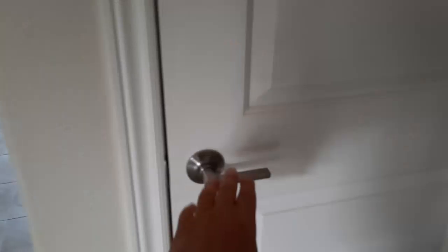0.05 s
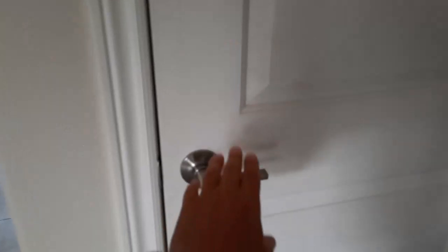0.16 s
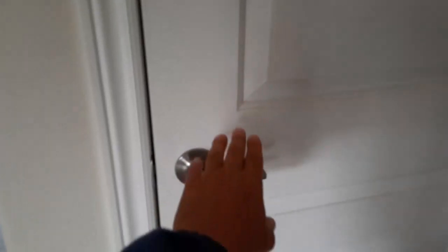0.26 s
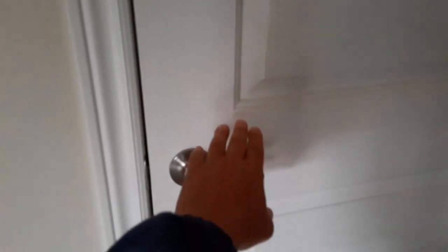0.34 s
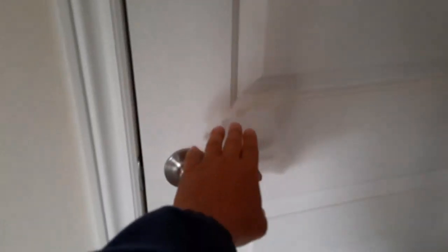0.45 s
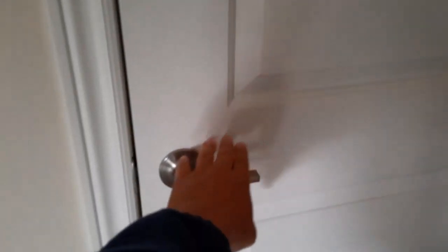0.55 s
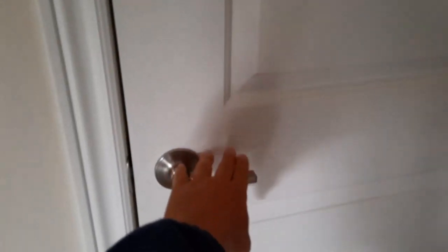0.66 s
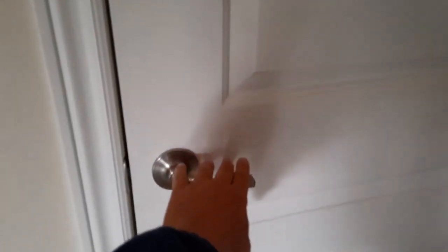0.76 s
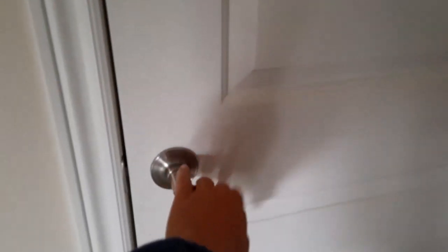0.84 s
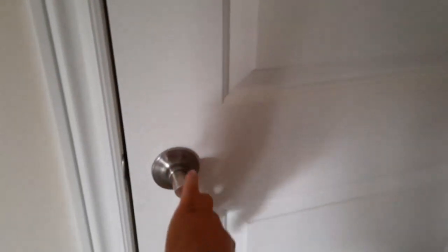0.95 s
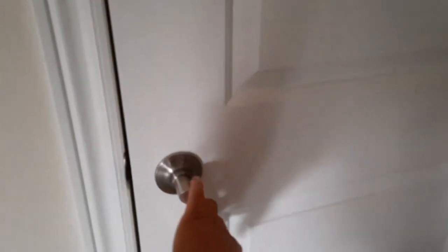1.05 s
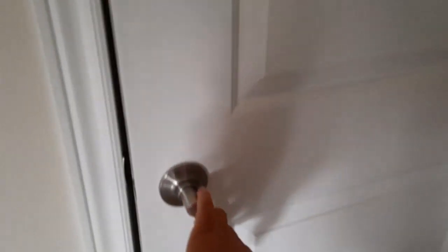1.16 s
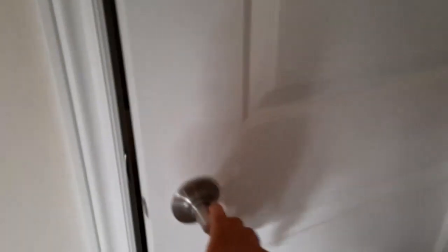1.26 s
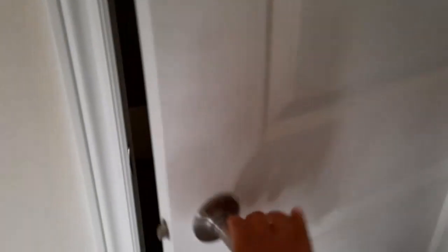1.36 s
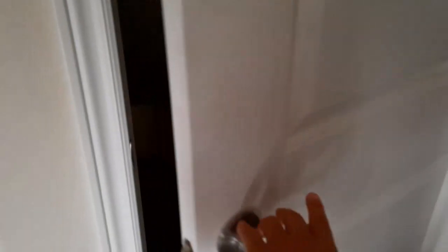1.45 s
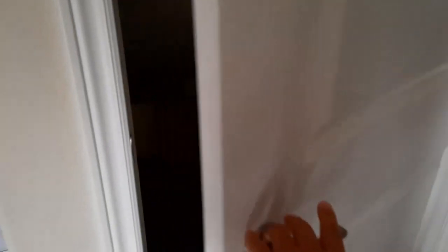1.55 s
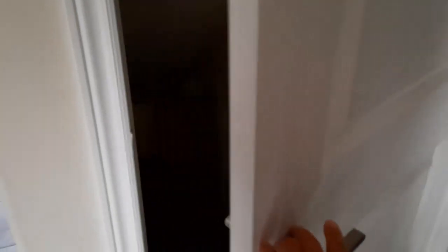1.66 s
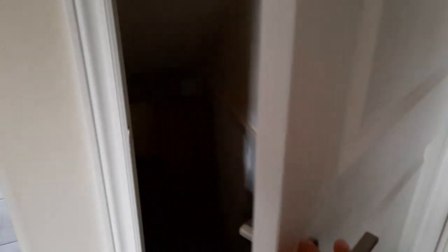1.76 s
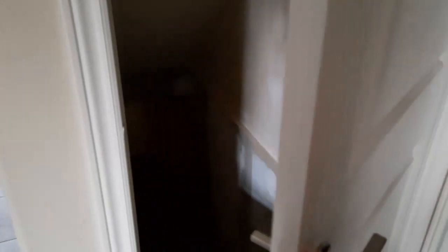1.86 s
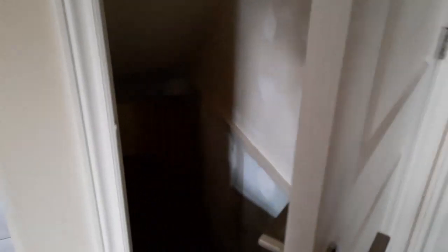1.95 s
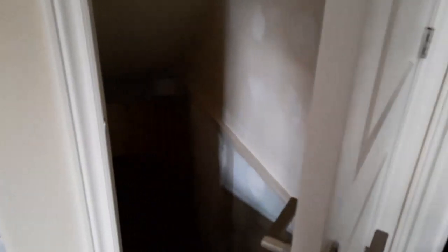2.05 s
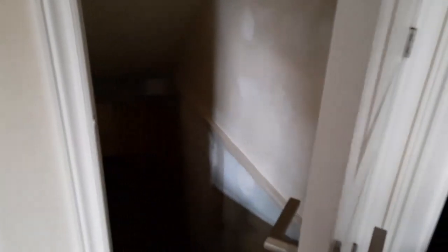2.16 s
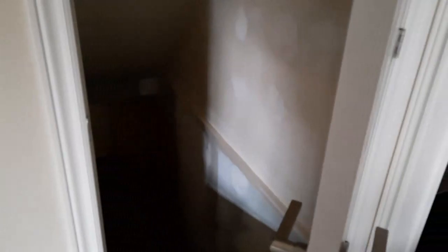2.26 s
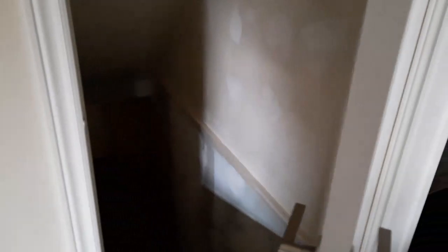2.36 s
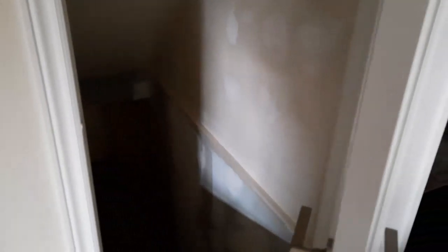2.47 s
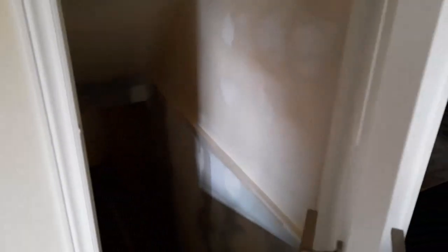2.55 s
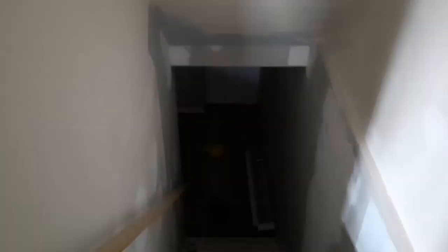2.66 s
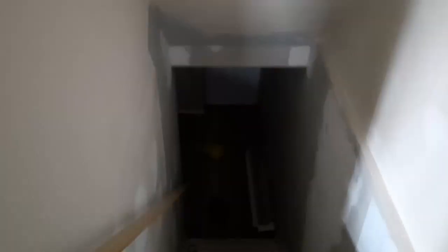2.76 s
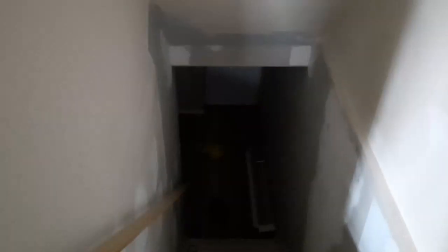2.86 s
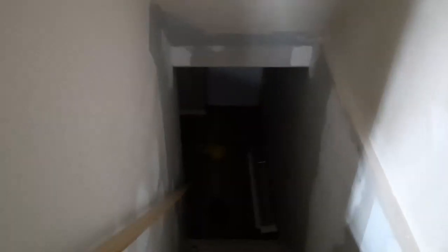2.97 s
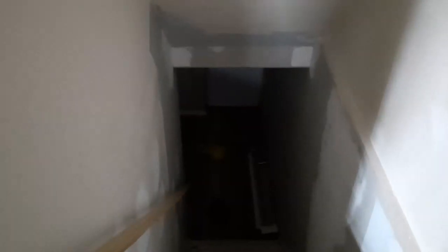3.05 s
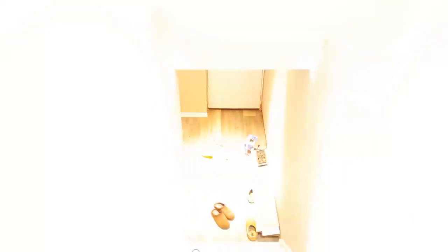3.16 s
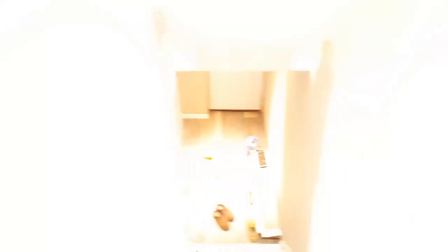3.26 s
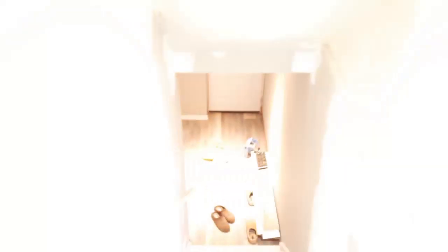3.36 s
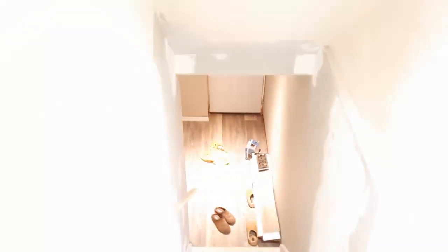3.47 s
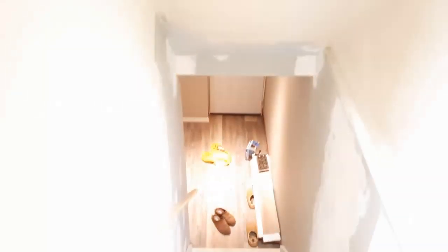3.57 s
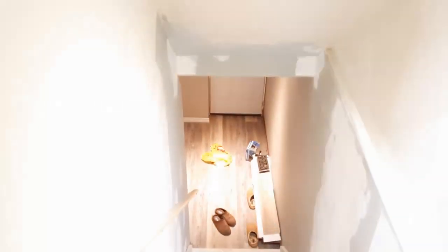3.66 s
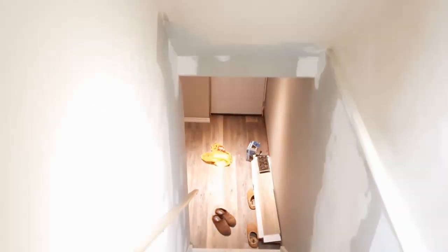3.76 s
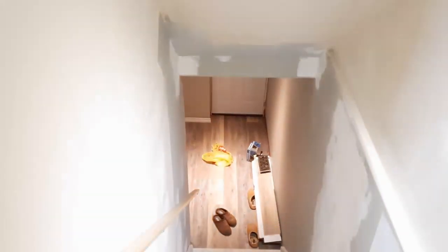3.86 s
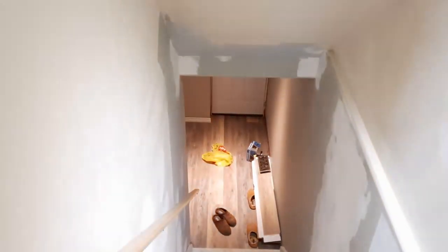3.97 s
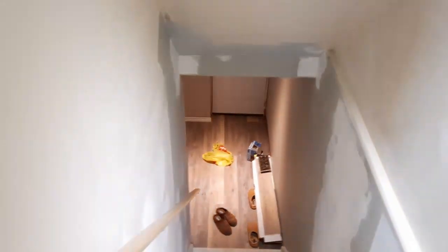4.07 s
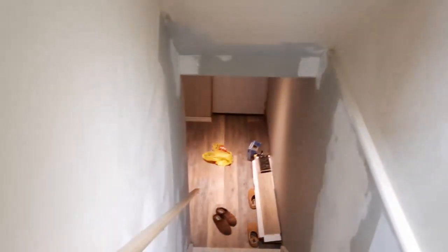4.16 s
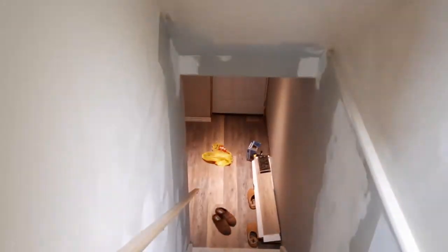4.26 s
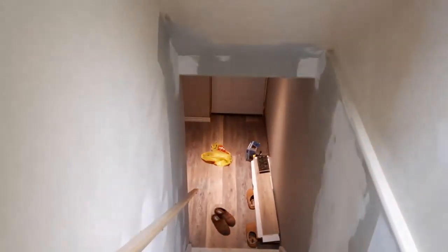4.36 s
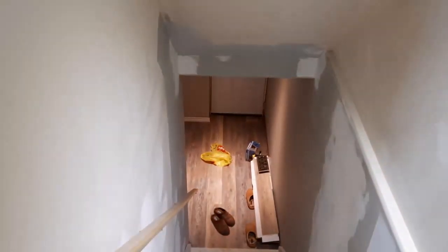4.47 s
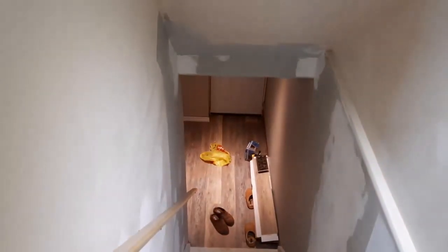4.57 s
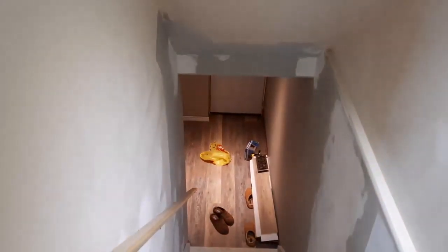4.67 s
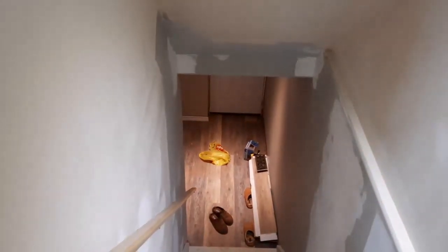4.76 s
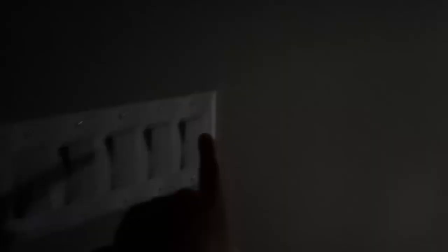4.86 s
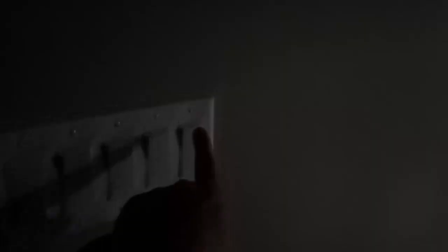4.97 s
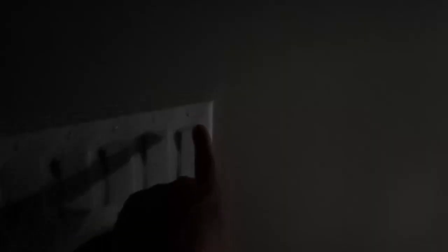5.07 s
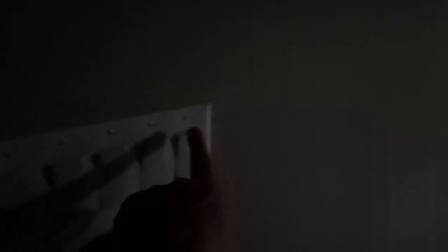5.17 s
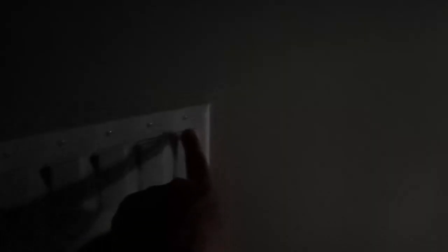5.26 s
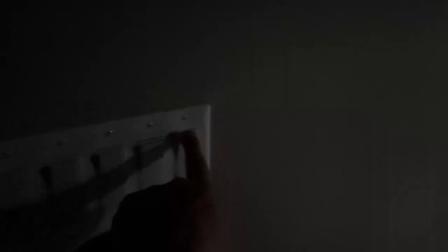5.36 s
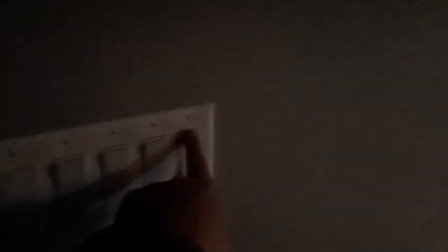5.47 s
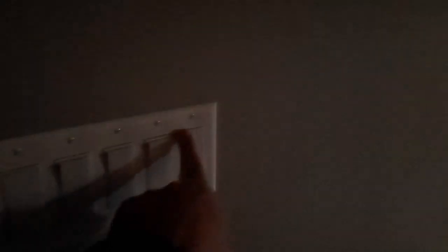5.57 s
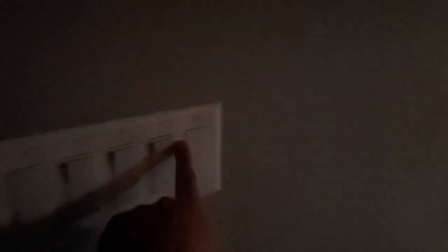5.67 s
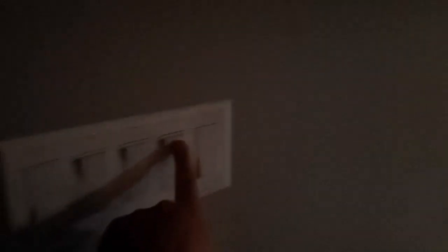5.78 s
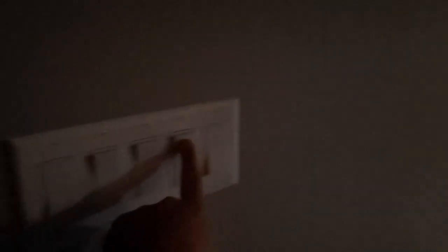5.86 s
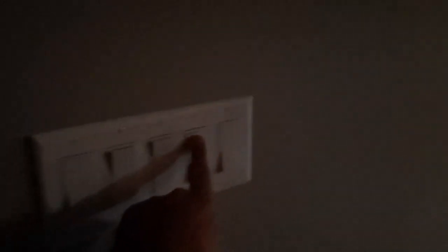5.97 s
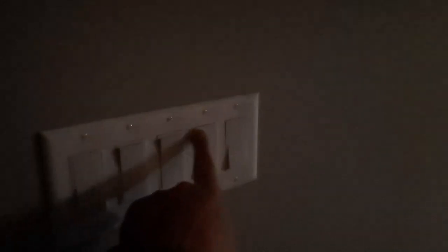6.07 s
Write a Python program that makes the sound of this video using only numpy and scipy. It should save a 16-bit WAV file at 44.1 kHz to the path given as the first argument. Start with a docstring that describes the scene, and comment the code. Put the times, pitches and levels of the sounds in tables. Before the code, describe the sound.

Close hand-held stereo microphones in a quiet house with a faint low hum. A door lever clicks and rattles, its latch squeaks upward, and the wooden door jolts free with hard knocks and a rub, then a very faint hinge creak. A switch snaps loudly in an echoing stairwell; after soft grip scuffs the hum stops, and two drier switch snaps follow.

```python
"""A quiet house on close, hand-held stereo microphones: low hum, sleeve noise, the first instants dipped in level.
A lever handle clicks, the latch squeaks back, a wooden door jolts free of its frame and its hinge creaks.
Then a rocker switch snaps at the top of an echoing stairwell, the grip scuffs, the hum ends, two more snap.
Blows ring resonances through walls and tail, the squeak sums stick-slip overtones, rubs are shaped noise,
and the hum is a wavering sine; the level dips briefly four more times between door and second switch."""
import sys
import numpy as np
from scipy import signal
from scipy.fft import rfft, irfft
from scipy.io import wavfile
from scipy.ndimage import uniform_filter1d

SR = 44100
rng = np.random.default_rng(int(sys.argv[2]) if len(sys.argv) > 2 else 0)


def persist_wave(psi):
    """Save psi, clipped to +-1, as 16-bit WAV."""
    counts = np.round(np.clip(psi, -1, 1) * 32767).astype(np.int16)
    wavfile.write(sys.argv[1], SR, np.atleast_2d(counts).T)


N = 269892
TAPS = 8192  # length of a struck response, in samples


# metal clicks of lever, spring and latch [t/s, level/dB, brightness/dB, direct/dB]
LATCH_CLICKS = [(0.61, -72.5, 7, 4.5), (0.865, -52, 3.5, -7), (.8735, -39, -3.5, -16),
                (0.9, -28.5, -2.5, -7), (.918, -35, 9, -7), (.940, -32, 0, -2.5), (1.011, -42, -0.5, 7),
                (1.128, -31.5, -10.5, 4), (1.356, -45.5, -4, -2), (1.3956, -27, 3.5, -3.5),
                (1.422, -25.5, -0.5, -2.5), (1.4293, -19, -6.5, 1.5), (1.452, -36, 1.5, -2.5),
                (1.475, -28.5, -3, -2), (1.558, -35, -3.5, -8), (1.6212, -42, -10.5, 5.5),
                (1.713, -71.5, 13.5, -3)]
# the door knocks in its frame and rebounds once; the first row is the palm landing on the door [t/s, level/dB,
# panel weight/dB, rebound after/s]
DOOR_KNOCKS = [(0.637, -64.5, 9, 0.071), (.799, -51.5, -2, 0.016), (.822, -50.5, -8, 0.016),
               (.899, -35.5, 1, 0.041), (.959, -30, -5, 0.027), (1.030, -37, -5.5, .032),
               (1.142, -36, -1.5, 0.051), (1.383, -36, -15.5, .013), (1.454, -27, -7, 0.024),
               (1.4813, -22, -11.5, .0095), (1.564, -27.5, -14.5, .011), (1.6202, -34, -24, .016)]
CLICK_THUMP_DB, CLICK_KNOCK_DB = -17.5, -3.5  # how little a click stirs the panel and the wood
KNOCK_CLACK_DB, KNOCK_TICK_DB = -10.5, -24.5  # how little a knock stirs the metal
REBOUND_DB, KNOCK_DIRECT_DB = -5, 4


def door_blows():
    """Clicks stir mostly metal, knocks mostly wood: t/s, thump, knock, clack and tick/dB, direct/dB."""
    for start, level_db, bright_db, direct_db in LATCH_CLICKS:
        yield start, level_db + np.array([CLICK_THUMP_DB, CLICK_KNOCK_DB, 0, bright_db]), direct_db
    for start, level_db, weight_db, rebound_s in DOOR_KNOCKS:
        band_db = level_db + np.array([weight_db, 0, KNOCK_CLACK_DB, KNOCK_TICK_DB])
        yield start, band_db, KNOCK_DIRECT_DB
        yield start + rebound_s, band_db + REBOUND_DB, KNOCK_DIRECT_DB


# centres of the thump, knock, clack and tick bands [f/Hz]
DOOR_BANDS = [100, 350, 1400, 6000]
# broad colour of the struck door [f/Hz, level/dB]
DOOR_COLOUR = [(18, -54.5), (30, -25.5), (81, -15), (245, -5.5), (295, -1), (355, -8.5), (404, -2),
               (473, -9), (866, -3), (1130, -11.5), (1460, -11.5), (11400, -40.5), (16000, -39.5)]
# resonances of door and latch [f/Hz, width/Hz, lift/dB]
DOOR_MODES = [(84.5, 8, 6), (161.5, 3, 9.5), (297, 22, 3.5), (393, 16, 8), (422, 10, -2), (505, 25, 4.5),
              (529.4, 14, 11), (620, 11, 6), (722.5, 11, 6.5), (862.3, 7.8, 4), (1184.3, 39, 5.5),
              (1356, 39, -2.5), (2100, 66, 1), (2500, 430, 9.5), (3340, 63, 6.5), (11840, 2200, 7)]


def door(blow_s=0.0086, spot_db=5.0):
    """Every blow rings the same door; where it lands decides how much panel, wood and metal answer."""
    hz = np.fft.rfftfreq(TAPS, 1 / SR)
    out = np.zeros((2, N))
    response = body(DOOR_COLOUR, DOOR_MODES, uneven_db=2.25)
    parts = []
    for share in np.eye(len(DOOR_BANDS)):
        band = read(list(zip(DOOR_BANDS, share)), hz)
        parts.append(unit(response * band ** 2))
    for start, band_db, direct_db in door_blows():
        power = sum((amp(db) * part) ** 2 for db, part in zip(band_db, parts))
        gain = np.sqrt(blow_s * SR * power)
        # each point of contact favours its own metal resonances
        gain *= amp(spot_db * wobble(size=45) * hz / (hz + 2000))
        space = room(direct_db, pan_db=-3.0, lag=.00014, build=0, length=0.85,
                     walls_db=-2.0, tail_db=1.0, swell_hz=100)
        add(out, start, heard(ring(gain), space))
    return out


# partials of the squeaking latch [multiple of the fundamental, level/dB]
SQUEAK_ORDERS = [(1, -2.5), (2, -9), (3, -16.5), (4, -12.5), (5, -21.5), (6, -24), (7, -24.5), (8, -26),
                 (9, -29.5)]
SQUEAK_FROM_S, SQUEAK_TO_S = 1.12, 1.30  # the latch bolt slides back
SQUEAK_LOW_HZ, SQUEAK_HIGH_HZ = 1413, 1805  # pitch follows the bolt's travel, easing in and out
SQUEAK_DB, SQUEAK_SWELL_DB = -47, 10.5  # base level, and its growth as the spring tightens
BITE_DB, BITE_DEPTH_DB, BITE_SKEW = 4.5, 15, 1.8  # overtones arch up late, where the bolt bites hardest
BITE_DIP = .35  # share of the overtones' arch that the fundamental gives up


def squeak(jitter=.004, flutter_db=2.5):
    """Metal sticks and slips on the strike plate, faster and louder as the bolt draws back."""
    span = slice(round(SQUEAK_FROM_S * SR), round(SQUEAK_TO_S * SR))
    progress = np.linspace(0, 1, span.stop - span.start)
    travel = np.sin(np.pi / 2 * progress) ** 2
    hz = SQUEAK_LOW_HZ + (SQUEAK_HIGH_HZ - SQUEAK_LOW_HZ) * travel
    turns = np.cumsum(hz * (1 + jitter * drift(250)[span])) / SR
    bite_db = BITE_DB - BITE_DEPTH_DB * (1 - np.sin(np.pi * progress ** BITE_SKEW))
    tone = np.zeros(len(turns))
    for order, order_db in SQUEAK_ORDERS:
        lift_db = bite_db * (1 if order > 1 else -BITE_DIP)
        flutter = flutter_db * drift(220)[span]  # each partial flutters by itself
        tone += amp(order_db + lift_db + flutter) * np.sin(2 * np.pi * order * turns)
    tone *= amp(SQUEAK_DB + SQUEAK_SWELL_DB * progress) * signal.windows.tukey(len(turns), .08)
    space = room(direct_db=2.0, pan_db=-8.0, lag=.00002, build=0, length=1.0,
                 walls_db=2.5, tail_db=-4, swell_hz=0)
    out = np.zeros((2, N))
    add(out, SQUEAK_FROM_S, heard(tone, space))
    return out


# the bolt, then the door edge, rub along the frame [t/s, rise/s, hold/s, level/dB]
FRAME_RUBS = [(1.16, 0.098, 0.066, -46), (1.318, .008, .1, -35.5)]
# wood dragging over wood [f/Hz, level/dB]
RUB_COLOUR = [(59, -51), (100, -23.5), (389, -2.5), (691, -21.5), (930, -10), (1360, -19.5), (1720, -13),
              (2270, -21), (4570, -22), (16000, -36.5)]
# the hinge creaks faintly as the door swings [t/s, rise/s, hold/s, level/dB]
HINGE_CREAKS = [(1.87, 0.067, 0.031, -61)]
# colour of the hinge [f/Hz, level/dB]
CREAK_COLOUR = [(250, -36), (700, -7), (950, 0.5), (1300, -23.5), (1750, -14), (2050, -4), (2450, -24),
                (8000, -31)]


def rub(grain_db=2.5):
    """Painted wood drags over wood in small catches; then the hinge creaks."""
    frame = noise(RUB_COLOUR) * strokes(FRAME_RUBS, release_s=0.0091)
    hinge = noise(CREAK_COLOUR) * strokes(HINGE_CREAKS, release_s=0.08)
    return (frame + hinge) * amp(grain_db * drift(300))


# three rockers, the first above the stairwell; pan is left over right, of the direct sound
# [t/s, level/dB, direct/dB, pan/dB, right microphone delay/s, echo build-up/s, echo t60 factor]
SWITCHES = [(3.099, -21, -4.5, 1.5, .00036, 0.072, 0.87), (5.426, -23.5, 0.5, -1.5, .00009, 0.00079, 1.015),
            (5.9873, -22.5, 3.5, -1.5, .00002, 0.0011, 1.26)]
# one broad colour for each rocker [f/Hz, level/dB]
SWITCH_COLOURS = [
    [(24, -48.5), (40, -9), (106, -16.5), (176, -9), (237, -16.5), (329, -4), (455, -14), (663, -8.5),
     (751, -22.5), (873, -14.5), (1340, -21), (2150, -12), (3470, -21), (12800, -17.5), (16000, -25.5)],
    [(24, -75), (40, -33), (106, -13), (226, -17), (283, -5), (402, -14.5), (585, -12), (852, -11),
     (1150, -9.5), (2630, -12), (5050, -22.5), (6170, -15.5), (8340, -26.5), (12100, -24), (16000, -35)],
    [(24, -60.5), (40, -11.5), (81, -32), (112, -7), (209, -14), (337, -2.5), (570, -12), (1070, -9),
     (1520, -19.5), (2150, -11.5), (3300, -19), (6490, -12), (8340, -21.5), (11800, -16), (16000, -23)],
]
# one set of resonances for each rocker [f/Hz, width/Hz, lift/dB]
SWITCH_MODES = [
    [(297, 40, 3.9), (660, 63, 1.4), (872, 38, 1.9), (1900, 280, 1.7), (2330, 470, 7.9), (7140, 200, 4),
     (9700, 200, 3)],
    [(302, 126, 5.9), (734, 36, 8.5), (950, 30, 5.6), (1400, 36, 1.8), (1726, 95, 6.8), (2670, 220, 2.6),
     (6100, 210, 2.8)],
    [(287, 27, 9.9), (1010, 97, 0.92), (1250, 390, 6.3), (2190, 170, 11.7), (2530, 390, 8.1),
     (4430, 500, 5.1), (6330, 490, 4.9)],
]
# the fingertip lands, the rocker trips, strikes its stop and bounces [t after the snap/s, level/dB]
SNAP = [(-.043, -53), (-.004, -32), (0, -3), (.0011, -5), (.0078, -7)]


def switches(blow_s=0.018):
    """Each rocker snaps over and rings its plastic plate and the hollow wall behind it."""
    out = np.zeros((2, N))
    for place, colour, modes in zip(SWITCHES, SWITCH_COLOURS, SWITCH_MODES):
        start, level_db, direct_db, pan_db, lag, build, length = place
        click = amp(level_db) * np.sqrt(blow_s * SR) * ring(unit(body(colour, modes)))
        # direct sound and echoes together lean further to the same side
        lean = amp([[pan_db / 4], [-pan_db / 4]])
        for delay, contact_db in SNAP:
            # a deeper space fills more slowly and its tail carries more energy
            space = room(direct_db, pan_db, lag, build, length, walls_db=-2,
                         tail_db=2.0 + 60 * build, swell_hz=900 + 50000 * build)
            add(out, start + delay, amp(contact_db) * heard(click, space) * lean)
    return out


# the hand shifts its grip beside the right microphone [t/s, rise/s, hold/s, level/dB]
GRIP_SCUFFS = [(4.109, .002, 0.02, -47), (4.15, 0.036, 0.092, -60), (4.30, 0.043, 0.026, -64),
               (4.66, 0.045, 0.079, -66.5)]
# colour of skin at the microphones [f/Hz, level/dB]
GRIP_COLOUR = [(24, -42), (40, -5.5), (185, -5), (243, -17), (329, -0.5), (491, -17), (2150, -17),
               (3470, -23), (7930, -25.5), (11300, -17.5), (16000, -24.5)]
# a sleeve slides as the arm moves [t/s, rise/s, hold/s, level/dB]
ARM_MOVES = [(0, 0.015, 0.4, -64), (.57, 0.059, 0.037, -64), (2.1, 0.47, .02, -65.5),
             (2.7, .03, 0.052, -68.5), (3.45, 0.16, 0.29, -73), (4.89, 0.017, 0.018, -73),
             (5.62, 0.026, .01, -70)]
# colour of the cloth [f/Hz, level/dB]
SLEEVE_COLOUR = [(880, -37), (1500, -10), (2000, -7), (3410, -6.5), (4420, -12.5), (6180, -6),
                 (12500, -1.5), (16000, -15.5)]
# a fingertip slides on a rocker before it trips [t/s, rise/s, hold/s, level/dB]
FINGER_TOUCHES = [(5.37, 0.016, 0.01, -55.5), (5.935, .01, 0.044, -68.5)]
# colour of the fingertip on plastic [f/Hz, level/dB]
FINGER_COLOUR = [(100, -9), (350, 7), (1200, -21), (2300, -6.5), (4000, -20), (7000, -40), (16000, -46)]


def handling(grain_db=2.3, grip_pan_db=-14, sleeve_grain_db=0.6, finger_grain_db=2.0):
    """Skin scuffs beside the microphone and on the rockers and cloth slides, in small uneven grains."""
    grip = noise(GRIP_COLOUR) * strokes(GRIP_SCUFFS, release_s=0.024) * amp(grain_db * drift(248))
    sleeve = noise(SLEEVE_COLOUR) * strokes(ARM_MOVES, release_s=.13) * amp(sleeve_grain_db * drift(120))
    finger = noise(FINGER_COLOUR) * strokes(FINGER_TOUCHES, release_s=0.0082)
    finger *= amp(finger_grain_db * drift(200))
    return grip * amp([[grip_pan_db / 2], [-grip_pan_db / 2]]) + sleeve + finger


# low noise of the quiet house [f/Hz, level/dB]
HOUSE_COLOUR = [(15, -50), (25, -19), (87, -2), (149, -10.5), (180, 3), (206, -10.5), (416, -11),
                (503, -17.5), (545, -17), (2000, -25.5), (2480, -31), (11300, -32.5), (16000, -43)]
HOUSE_DB = -63.5
HUM_DB, HUM_NEARING_DB_PER_S = -73, 1.8  # the hum grows towards the stairwell
HUM_ENDS_S = 4.88


def house(hum_hz=179, waver=0.0047, swell_db=0.5, fade_s=0.023):
    """Low room noise and the wavering hum of a distant fan."""
    t = np.arange(N) / SR
    turns = np.cumsum(hum_hz * (1 + waver * drift(16))) / SR
    hum_level = amp(HUM_DB + HUM_NEARING_DB_PER_S * t + swell_db * drift(9.9))
    hum_level *= np.clip((HUM_ENDS_S - t) / fade_s, 0, 1)
    hum = np.sqrt(2) * np.sin(2 * np.pi * turns) * hum_level
    return noise(HOUSE_COLOUR) * amp(HOUSE_DB + .5 * drift(3.2)) + hum


# near walls, each delay varied at random by up to 30 % [delay/s, level/dB]
WALLS = [(.0034, -4.5), (.0052, -2), (.0089, -8.5), (0.0114, -12), (0.021, -16.5), (.029, -17)]
# time for the tail to fall 60 dB, scaled by each place's factor [f/Hz, t60/s]
ROOM_T60 = [(80, 0.48), (300, 0.36), (900, 0.43), (2200, 0.4), (6000, 0.48), (10000, .37), (16000, 0.25)]
# what the walls return [f/Hz, level/dB]
TAIL_COLOUR = [(60, 4.5), (3000, 0.5), (7000, -4), (10000, -6), (16000, -3.5)]


def room(direct_db, pan_db, lag, build, length, walls_db, tail_db, swell_hz):
    """Direct sound, near walls, then a diffuse tail that holds for the build-up time and dies by band."""
    size = 32768  # samples
    echoes = rng.standard_normal((2, size)) * (rng.random((2, size)) < .2)  # sparse random echoes
    hz, t, z = signal.stft(echoes, SR, nperseg=256)
    hz = hz[:, None]
    fall_db = 60 * np.maximum(t - build, 0) / (length * read(ROOM_T60, hz))
    decay = amp(read(TAIL_COLOUR, hz) - fall_db)
    # bass takes longer than treble to fill the space
    swell = 1 - np.exp(-t / (.002 * (1 + swell_hz / (hz + 100))))
    tail = signal.istft(paired(z, hz) * decay * swell, SR, nperseg=256)[1][:, :size]
    out = amp(tail_db) * unit(tail) / np.sqrt(size)
    for delay, db in WALLS:
        arrival = delay * rng.uniform(.7, 1.3) + rng.uniform(0, 0.0003, 2)  # s, left and right
        at = np.round(arrival * SR).astype(int)
        out[[0, 1], at] += amp(db + walls_db) * rng.choice([-1, 1])
    out[0, 0] += amp(direct_db + pan_db / 2)
    out[1, round(abs(lag) * SR)] += amp(direct_db - pan_db / 2)
    return heard(crack(), out)


def crack(spread_s=.0012):
    """Bending waves reach the air at slightly different times, so a blow is a short crack."""
    delay = spread_s * (1 + np.tanh(wobble(size=200))) / 2
    phase = 2 * np.pi * np.cumsum(delay) / TAPS * SR
    return irfft(np.exp(-1j * phase))[:TAPS // 2]


def body(colour, modes, uneven_db=1.5):
    """Frequency response of a struck thing: main resonances and many small ones on a broad colour."""
    hz = np.fft.rfftfreq(TAPS, 1 / SR)
    peaks = sum((amp(db) ** 2 - 1) / (1 + (2 * (hz - f) / width) ** 2) for f, width, db in modes)
    small_db = uneven_db * wobble(size=10) * hz / (hz + 700)
    return amp(read(colour, hz) + small_db) * np.sqrt(np.maximum(1 + peaks, .1))


def ring(gain):
    """The causal click that has this frequency response, its phase following from its gain."""
    both_sides = np.r_[gain, gain[-2:0:-1]]
    log_gain = np.log(np.maximum(both_sides, gain.max() * 1e-5))
    return np.fft.ifft(np.exp(np.conj(signal.hilbert(log_gain)))).real[:TAPS // 2]


def heard(sound, response):
    """A mono sound through a stereo response."""
    return signal.fftconvolve(sound[None], response, axes=1)


def strokes(rows, release_s):
    """Level of sliding motions: each rises, holds and dies away."""
    t = np.arange(N) / SR
    level = np.zeros(N)
    for start, rise, hold, db in rows:
        attack = np.clip((t - start) / rise, 0, 1)
        release = np.exp(-np.maximum(t - start - rise - hold, 0) / release_s)
        level += amp(db) * attack * release
    return level


# likeness of the left and right microphones [f/Hz, correlation]
MIC_LIKENESS = [(60, 0.91), (300, 0.84), (640, 0.4), (1400, 0), (16000, 0.08)]


def paired(z, hz):
    """Two close microphones share the bass and differ in the treble."""
    same = np.clip(read(MIC_LIKENESS, hz), 0, 1)
    return np.array([z[0], same * z[0] + np.sqrt(1 - same ** 2) * z[1]])


def noise(colour):
    """Stereo noise of a given spectrum, rms 1."""
    hz = np.fft.rfftfreq(N, 1 / SR)
    spectrum = paired(rfft(rng.standard_normal((2, N))), hz)
    return unit(irfft(spectrum * amp(read(colour, hz)), N))


def drift(rate_hz):
    """Slow random motion of rms 1."""
    hz = np.fft.rfftfreq(N, 1 / SR)
    return unit(irfft(rfft(rng.standard_normal(N)) / (1 + (hz / rate_hz) ** 4), N))


def wobble(size):
    """A smooth random line of rms 1 across the frequency bins."""
    line = uniform_filter1d(rng.standard_normal(TAPS // 2 + 1), size)
    return unit(uniform_filter1d(line, size))


def read(points, hz):
    """Reads a table along log frequency."""
    f, value = np.transpose(points)
    return np.interp(np.log(hz + 1), np.log(f + 1), value)


def amp(db):
    """Decibels to gain."""
    return 10 ** (np.asarray(db) / 20)


def unit(x):
    """Scales to rms 1."""
    return x / np.sqrt(np.mean(x ** 2) + 1e-20)


def add(mix, start, sound):
    """Adds a stereo sound at a time in seconds."""
    part = mix[:, max(round(start * SR), 0):][:, :sound.shape[1]]
    part += sound[:, :part.shape[1]]


def scene():
    """Door, switches and the quiet around them."""
    return door() + squeak() + rub() + switches() + handling() + house()


# spells in which the level dips briefly [from t/s, to t/s]
LEVEL_DIPS = [(-.01, .061), (2.591, 2.652), (2.697, 2.727), (4.746, 4.782), (4.852, 4.907)]
CEILING = .97  # full scale is 1
EDGE_HZ = 16100


def record(dry, dip_db=-28):
    """The hardest peaks are rounded off below full scale; the level dips briefly a few times; treble ends at
    the edge."""
    t = np.arange(N) / SR
    dips = sum(((t > a) & (t < b)) * 1. for a, b in LEVEL_DIPS)
    rounded = CEILING * np.tanh(dry / CEILING)
    dipped = rounded * amp(dip_db * uniform_filter1d(dips, size=200))
    low_pass = signal.firwin(255, EDGE_HZ, window=("kaiser", 9), fs=SR)
    return signal.oaconvolve(dipped, low_pass[None], "same")


dry = scene()
out = record(dry)
persist_wave(out)
```